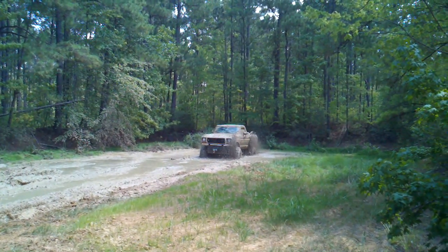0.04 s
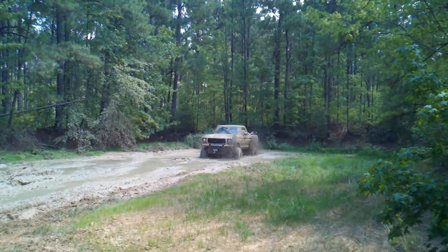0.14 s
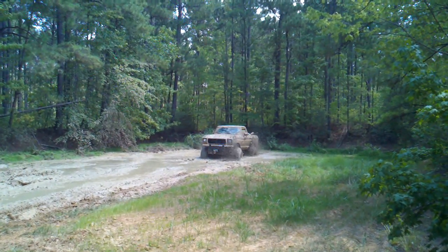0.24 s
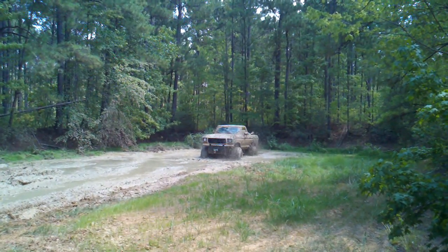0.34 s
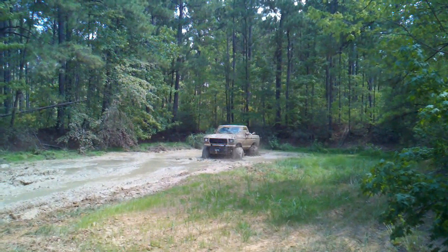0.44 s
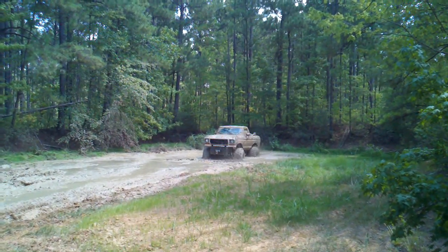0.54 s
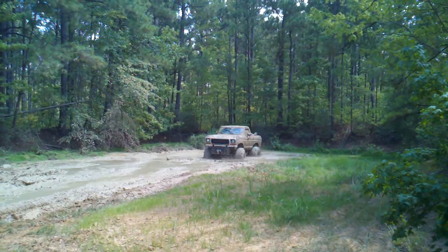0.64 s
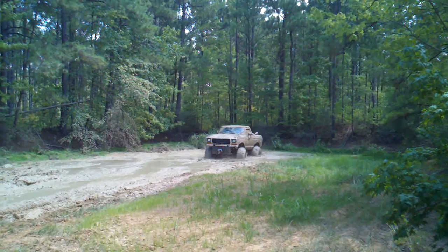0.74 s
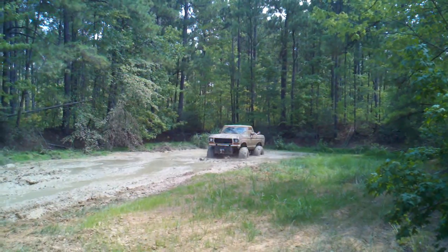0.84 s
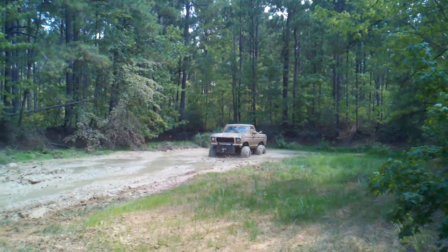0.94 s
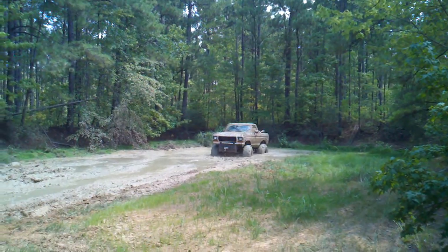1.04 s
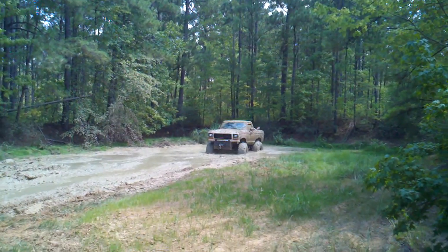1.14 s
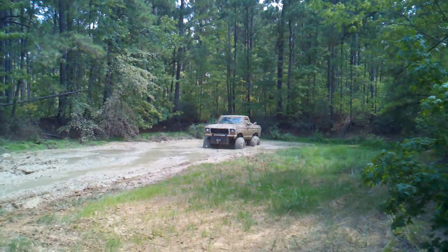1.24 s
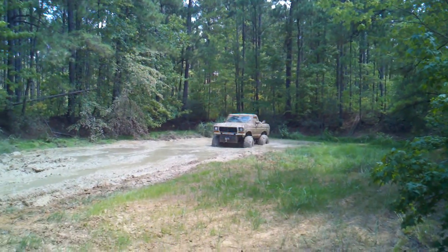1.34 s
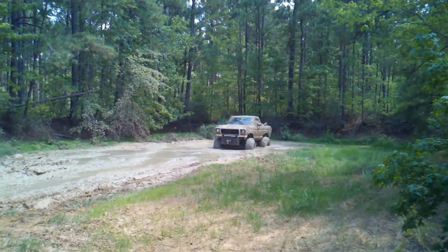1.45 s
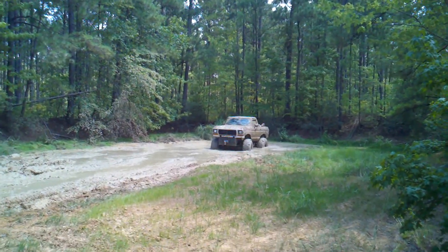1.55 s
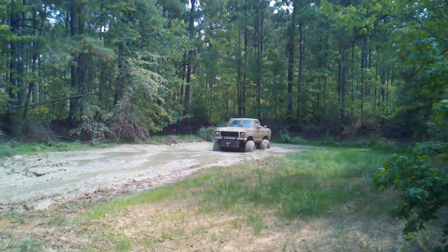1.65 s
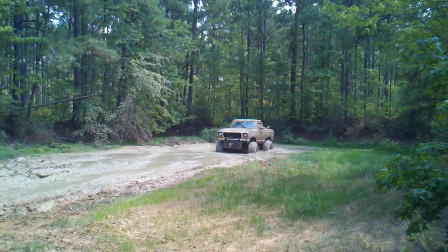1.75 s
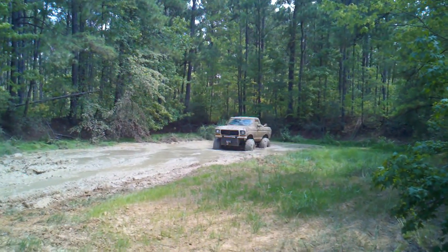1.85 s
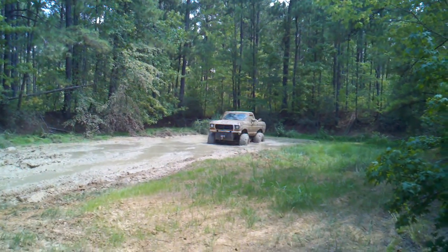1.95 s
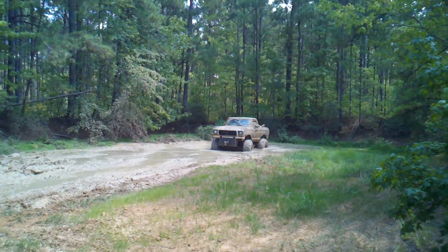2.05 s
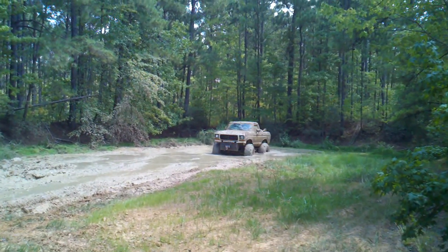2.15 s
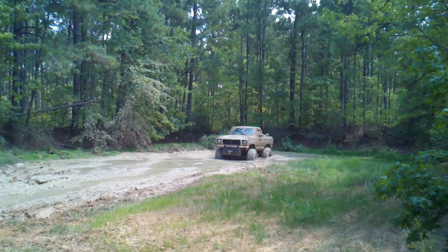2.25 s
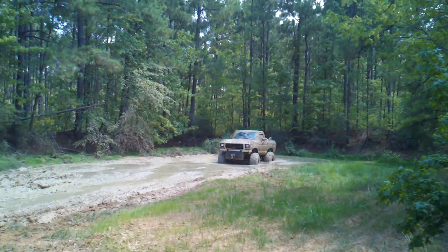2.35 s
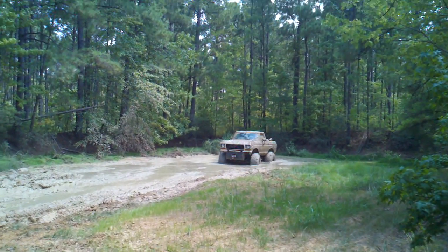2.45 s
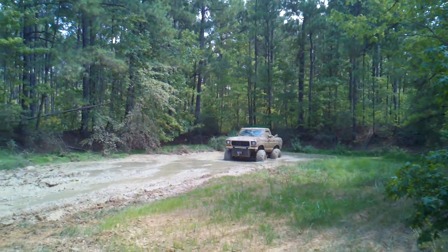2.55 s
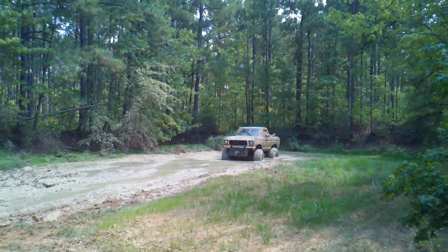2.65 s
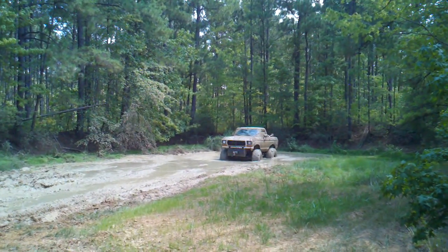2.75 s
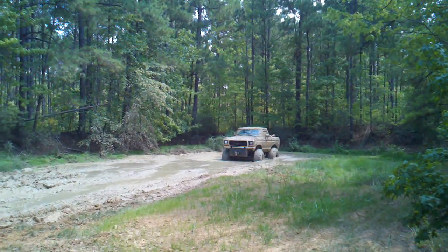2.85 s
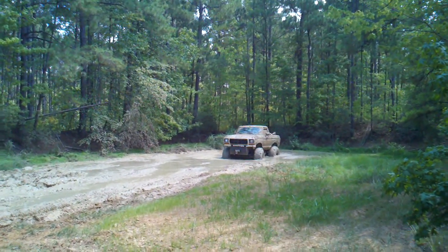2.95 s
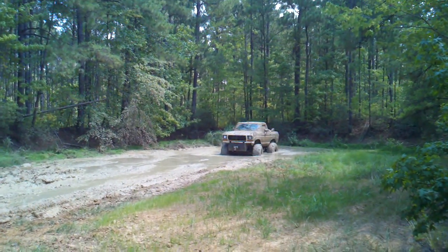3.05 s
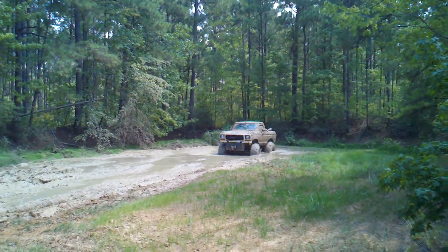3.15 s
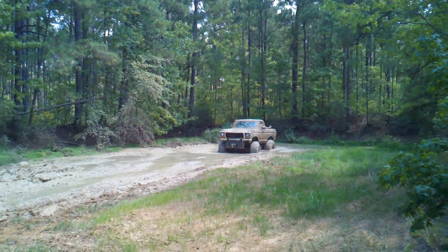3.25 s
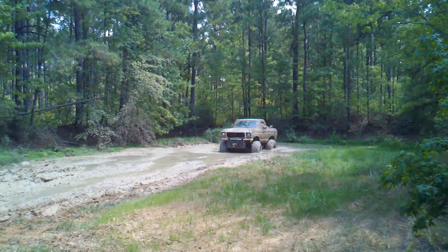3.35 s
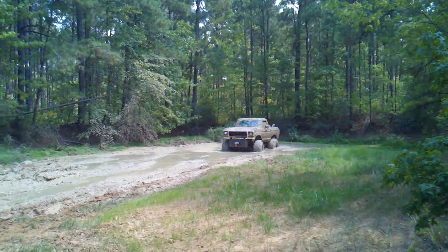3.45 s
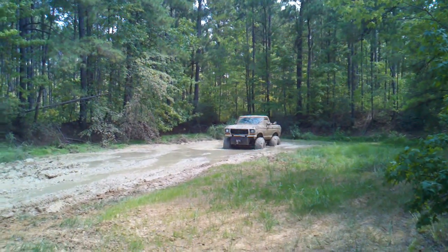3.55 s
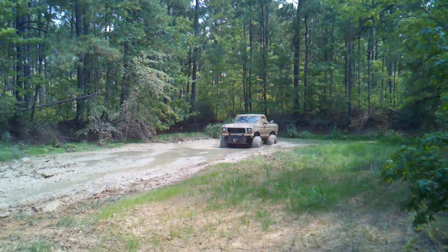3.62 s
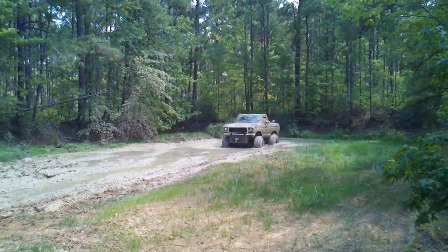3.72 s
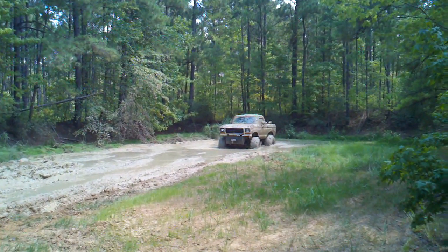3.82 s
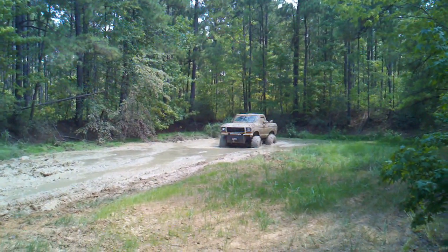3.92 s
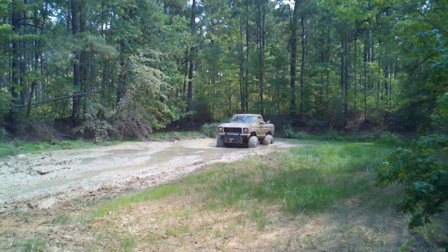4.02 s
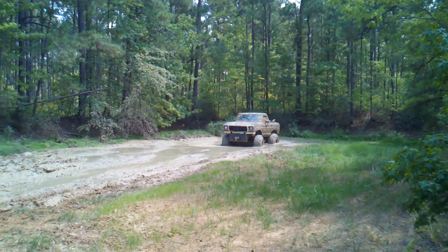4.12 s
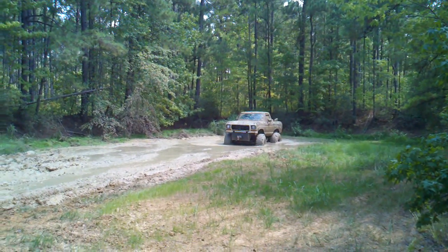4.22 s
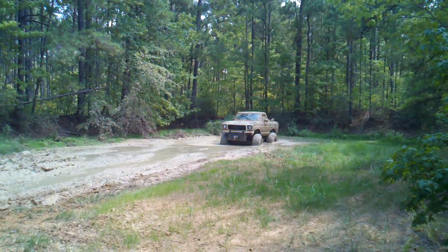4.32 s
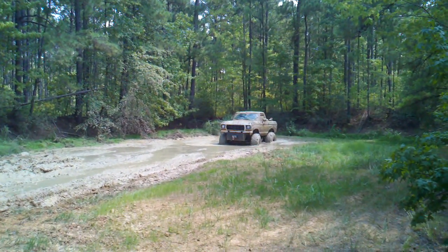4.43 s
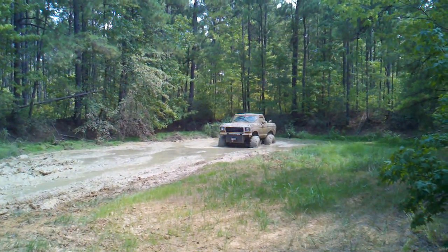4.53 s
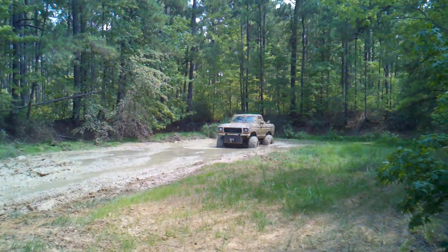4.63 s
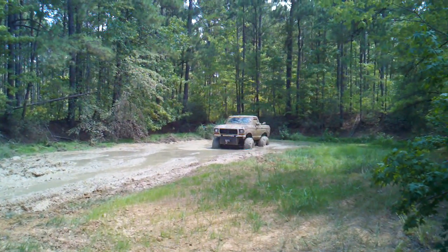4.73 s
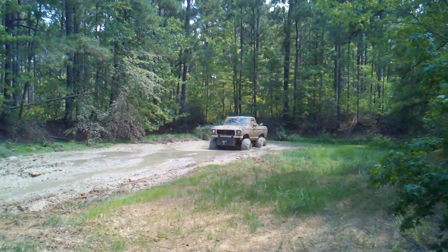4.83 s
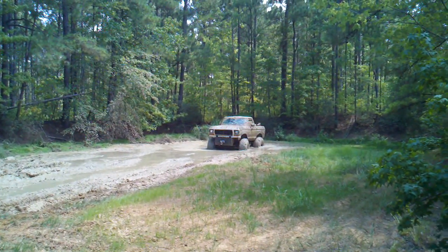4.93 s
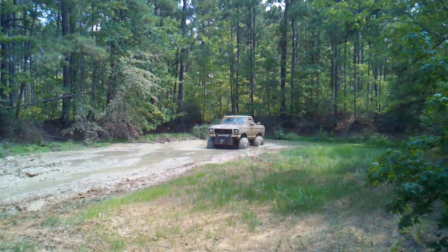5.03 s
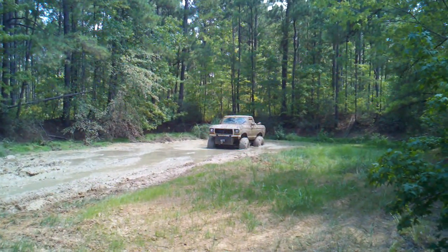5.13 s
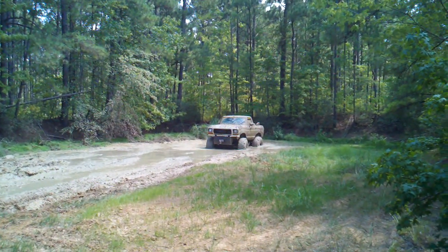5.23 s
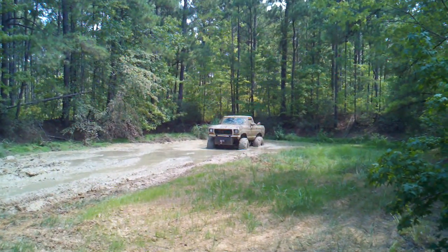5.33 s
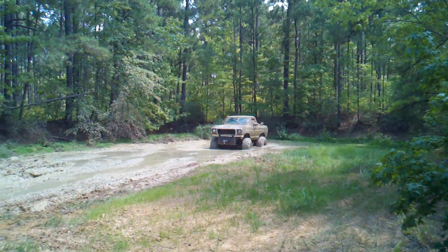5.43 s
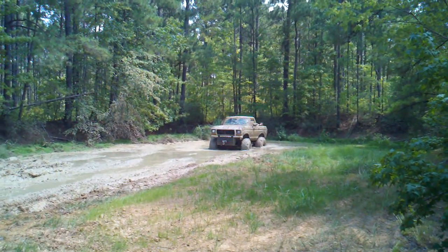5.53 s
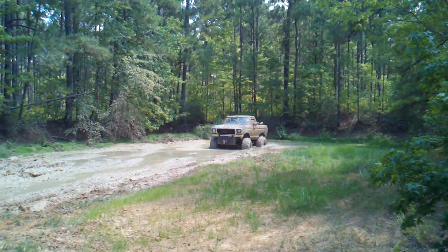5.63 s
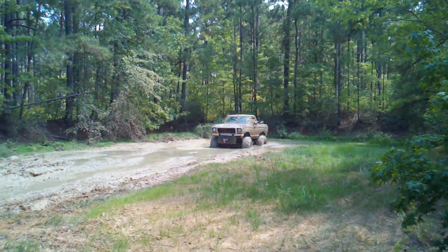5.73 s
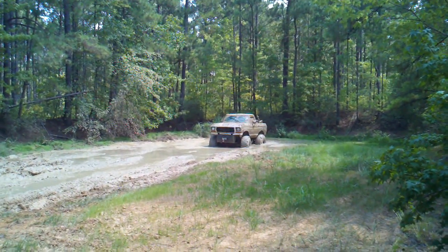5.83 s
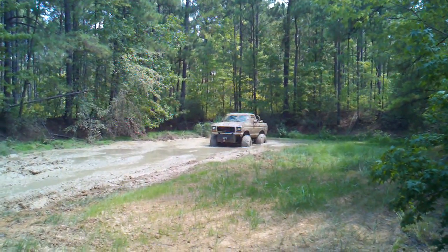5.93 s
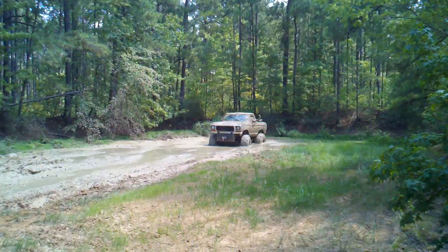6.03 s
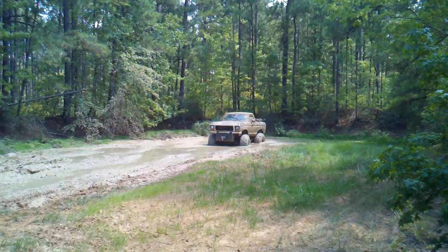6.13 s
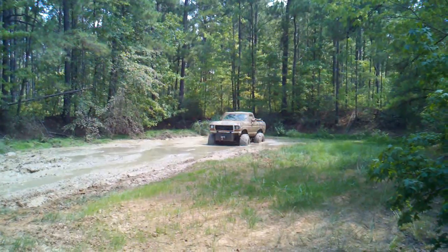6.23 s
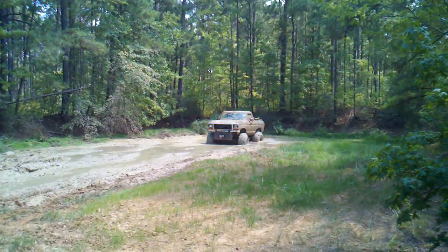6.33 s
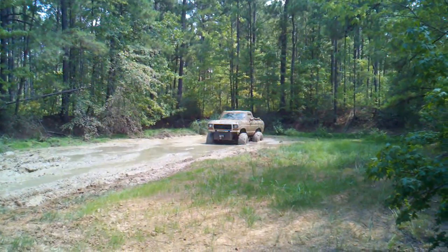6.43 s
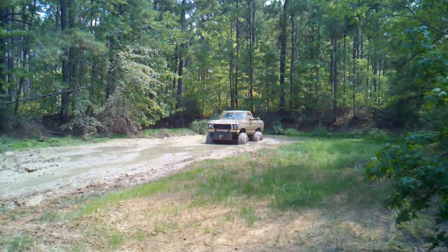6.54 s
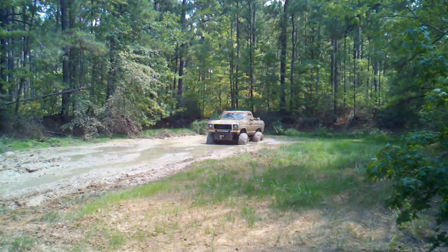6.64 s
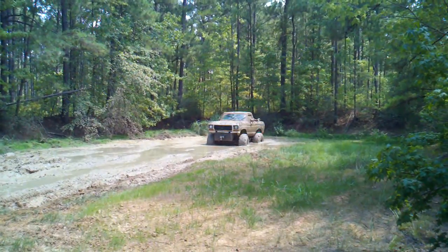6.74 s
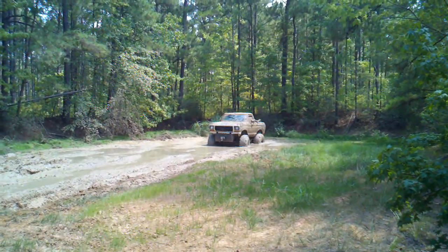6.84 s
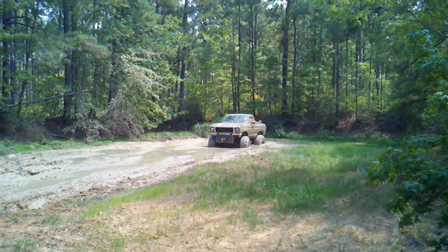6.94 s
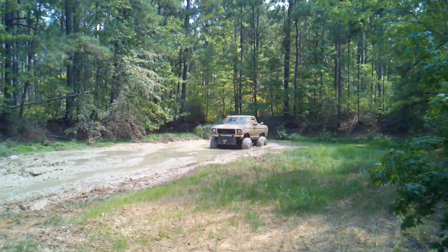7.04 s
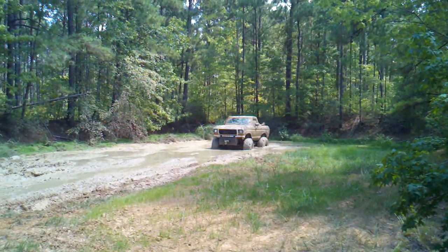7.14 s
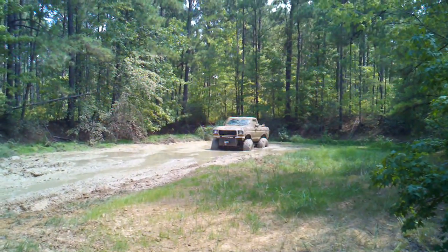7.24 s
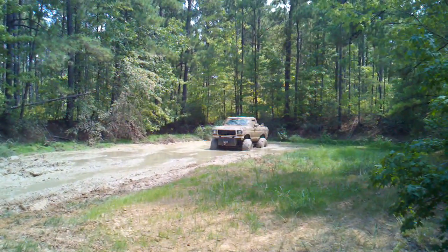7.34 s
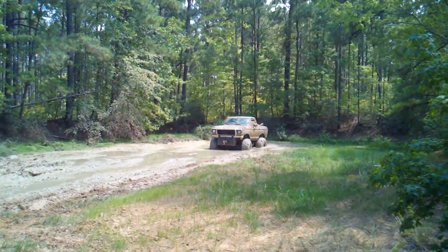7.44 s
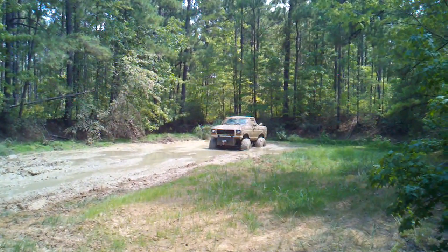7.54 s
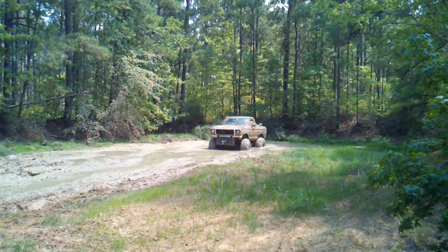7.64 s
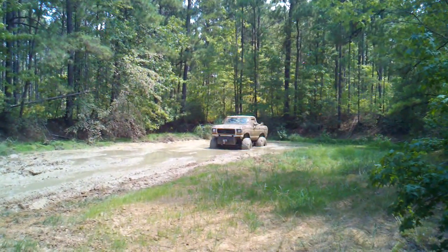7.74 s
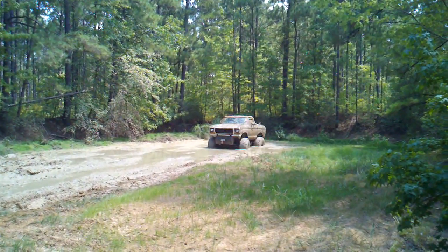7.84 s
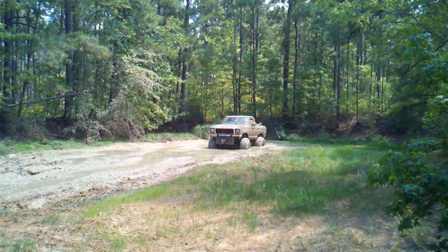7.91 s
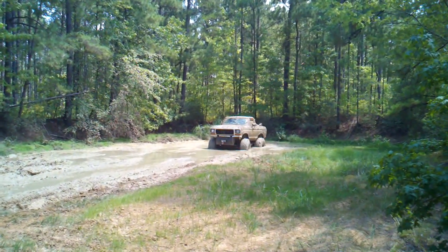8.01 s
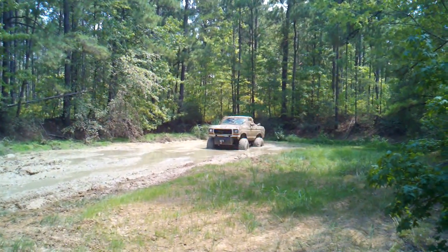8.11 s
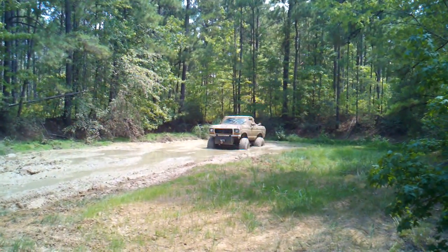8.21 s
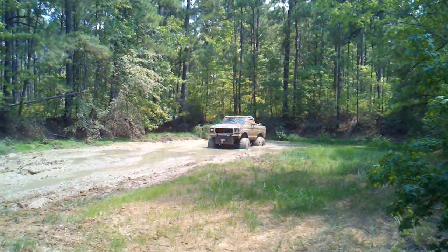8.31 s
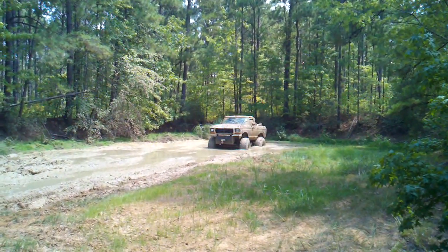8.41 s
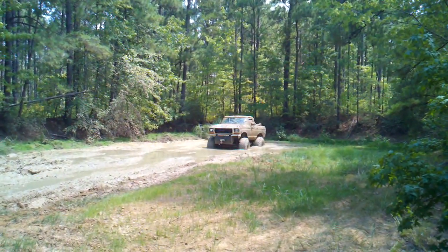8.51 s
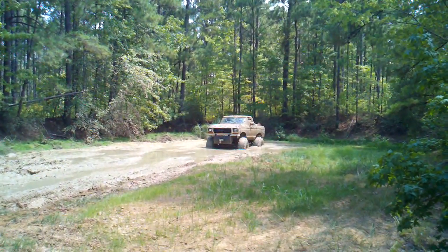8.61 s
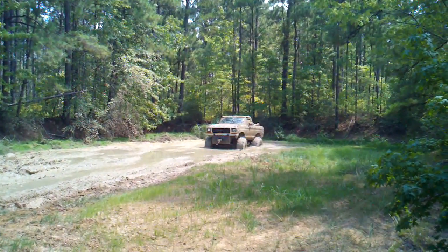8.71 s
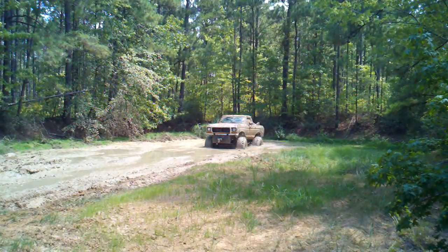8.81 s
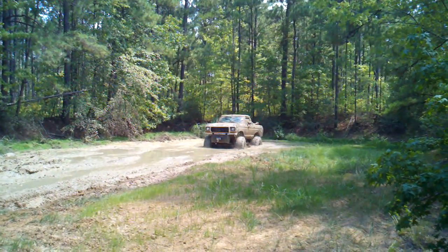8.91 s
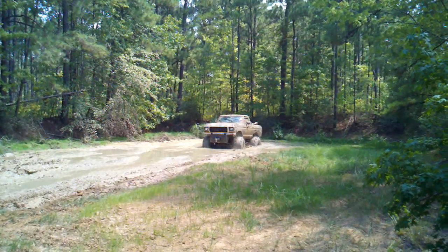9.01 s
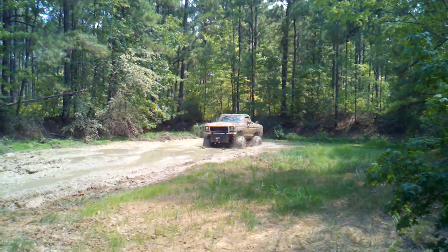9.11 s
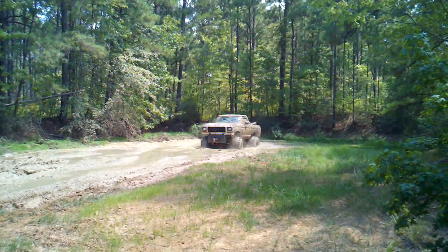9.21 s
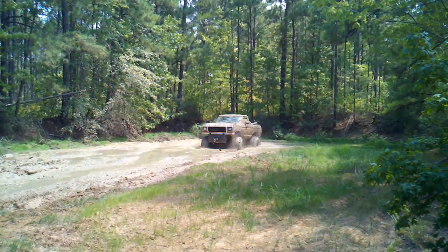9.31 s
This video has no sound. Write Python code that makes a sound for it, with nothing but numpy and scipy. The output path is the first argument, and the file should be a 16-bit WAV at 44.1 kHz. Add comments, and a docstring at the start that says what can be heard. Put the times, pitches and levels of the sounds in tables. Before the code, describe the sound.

Lumpy open-pipe V8 idling in a forest clearing, with sharp cracks and small clinks, before the revs climb steeply into a loud blaring howl.

```python
"""A lifted V8 truck stands in a mud hole in a forest clearing, some way off.
Its revs fall while thrown mud patters down; it lopes near idle with sharp cracks and clatter, then revs up hard.
Firing pulses ring the resonances of the open pipes; noise bursts make the gas, spray and cracks.
Sparse echoes from the trees throw much of the sound back over a faint background."""
import sys
import numpy as np
from scipy import signal
from scipy.fft import rfft, irfft
from scipy.io import wavfile
from scipy.ndimage import uniform_filter1d

SR = 44100
rng = np.random.default_rng(int(sys.argv[2]) if len(sys.argv) > 2 else 0)


def persist_wave(psi):
    """Save psi, clipped to +-1, as 16-bit WAV."""
    counts = np.round(np.clip(psi, -1, 1) * 32767).astype(np.int16)
    wavfile.write(sys.argv[1], SR, np.atleast_2d(counts).T)


N = 413209
TIME = np.arange(N) / SR
SIZE = 2 ** 19  # FFT length
HZ = np.fft.rfftfreq(SIZE, 1 / SR)
IDLE_CYCLES_PER_S = 4  # four-stroke cycles with the throttle at zero

# low resonances of pipes and body:
# (frequency [Hz], width [Hz], relative level at idle [dB], relative level at full load [dB])
BOOM_MODES = [(117, 63, -7.5, -19), (160.7, 24, -0.5, 25), (200, 98, -19, 6), (222.5, 21.4, -6.5, -18),
              (303, 35.6, -13, -18), (445, 340, -40, -9)]
# upper pipe resonances, whose relative weights change from idle to full load:
# (frequency [Hz], width [Hz], relative level at idle [dB], relative level at full load [dB])
BARK_MODES = [(492, 118, -17, -6), (600.8, 110, 2, 0), (720.4, 94, -8, 7), (1026, 22, -1.5, -9.5),
              (1127, 145, -14, 4.5), (1298, 87, -17, -45), (1403, 67, -5, -0.5), (1702, 165, -32, -9.5),
              (1785, 106, -15.5, -5), (2240, 1070, -26.5, -52)]
# treble colour of gas and spray: (frequency [Hz], relative level [dB])
HISS_COLOUR = [(80, -16), (900, -2.5), (2000, 4), (3000, -3), (3600, 2), (4100, 0.5), (4600, -7),
               (5300, -16), (6200, -4.5), (7300, -6), (9000, -7.5), (10500, -12), (12000, -11.5),
               (13200, -23), (14000, -6.5)]


def gain_of(db):
    """Decibels to amplitude."""
    return 10 ** (np.asarray(db) / 20)


def evened(x):
    """Scales to rms 1."""
    return x / np.sqrt(np.mean(x ** 2) + 1e-20)


def steadied(x, size=9000):
    """Scales to a running rms of 1, keeping the single beats."""
    power = uniform_filter1d(uniform_filter1d(x ** 2, size), size)
    return x / np.sqrt(abs(power) + 1e-14)


def curve(rows, order=1):
    """One column of a time table at every sample."""
    columns = np.transpose(rows)
    return np.interp(TIME, columns[0], columns[order])


def read(rows, hz, order=1):
    """One column of a frequency table on a log axis."""
    columns = np.transpose(rows)
    return np.interp(np.log(hz + 1), np.log(columns[0] + 1), columns[order])


def drift(hz):
    """Low-passed random drift of rms 1, up to a rate."""
    rate_hz, count = 400, 4096
    spectrum = rfft(rng.standard_normal(count))
    slow = irfft(spectrum / (1 + (np.fft.rfftfreq(count, 1 / rate_hz) / hz) ** 4))
    return evened(np.interp(TIME * rate_hz, np.arange(len(slow)), slow))


def ring(x, gain):
    """Causal minimum-phase filter with the given gain at each frequency."""
    cepstrum = irfft(np.log(np.maximum(gain, 1e-5)))
    cepstrum[1:SIZE // 2] *= 2
    cepstrum[SIZE // 2 + 1:] = 0
    return irfft(rfft(x, SIZE) * np.exp(rfft(cepstrum)))[:N]


def puffs(clicks, decay_s):
    """Each click lets out a burst of noise that dies away."""
    envelope = signal.lfilter([1], [1, -np.exp(-1 / (decay_s * SR))], clicks)
    return envelope * rng.standard_normal(N)


def ping(hz, peak_s):
    """A short ring with a soft start, its envelope peaking at 1 after peak_s."""
    t = TIME[:2000]
    age = t / peak_s
    return age * np.exp(1 - age) * np.sin(2 * np.pi * hz * t)


def level(throttle, rise, shut_db, pedal_db, rise_db):
    """Gain of a layer that grows with the throttle (0-1) and with load (0-1) or speed (octaves)."""
    return gain_of(shut_db + pedal_db * throttle + rise_db * rise)


def pedal(press_s=.3, release_s=.5, slack=.04):
    """Throttle opening (0-1), lug and blare (dB): each press rises quickly and falls away slowly."""
    # accelerator presses, the deepest at any moment sets the throttle:
    # (start [s], time to release [s], depth [0-1], extra boom from lugging [dB], extra bark [dB])
    press_rows = [(-.5, 0.57, 0.6, 1, -0.5), (1.181, 0.38, 0.66, 1.5, 0.5), (1.999, 0.29, 0.78, 1, -0.5),
                  (2.55, 0.67, 0.48, 0.5, -1), (3.651, 1.01, 0.29, 1, 0), (4.951, 0.57, 0.41, 1.5, -0.5),
                  (5.499, 0.5, 0.44, 7.5, 3.5), (5.947, 0.81, 0.36, 4.5, 0.5), (7.3, 0.71, 1, -1.5, 2),
                  (7.734, 0.62, 0.99, 0.5, -3.5), (8.113, 1.22, 0.66, -9, -1.5),
                  (8.8, 0.47, 0.98, -4, -1.5), (9.006, .4, 0.85, 1, -2.5)]
    presses = []
    for start_s, length_s, depth, _, _ in press_rows:
        rise = (TIME - start_s) / press_s
        fall = 1 - (TIME - start_s - length_s) / release_s
        presses.append(depth * np.clip(np.minimum(rise, fall), 0, 1))
    presses = np.array(presses)
    # average of the extras, weighted by depth
    lug_db, blare_db = np.transpose(press_rows)[3:] @ presses / (presses.sum(0) + slack)
    throttle = np.maximum(presses.max(0), slack)  # never quite closes
    return throttle, lug_db, blare_db


def crank(speed, load, wobble=.02):
    """Four-stroke cycles turned so far; the speed wanders at idle and firms up under load."""
    return np.cumsum(speed * (1 + wobble * (1 - load) * drift(8.94))) / SR


def firings(cycles, load, scatter_db, jitter_s):
    """One pulse a cylinder, uneven in strength and timing at idle and steadier under load."""
    # strength of each cylinder in firing order, the two banks taking uneven turns: [dB]
    cylinders_db = [3, -3.5, 0.5, 2.5, -9.5, -2.5, 2, 0]
    count = np.floor(len(cylinders_db) * cycles).astype(int)
    at = np.flatnonzero(np.diff(count, prepend=0) > 0)
    chance = rng.uniform(-1, 1, (N, 2))[count[at]].T
    strength, delay = chance * (1 - .5 * load[at])
    size = gain_of(np.take(cylinders_db, count[at] % len(cylinders_db)) + scatter_db * strength)
    shifted = at + (jitter_s * SR * delay).astype(int)
    return np.bincount(np.clip(shifted, 0, N - 1), size, N)


def voice(modes, column, low_hz, steep=3):
    """Gain of a set of resonances at each frequency; the open end radiates no deep bass."""
    resonances = sum(gain_of(m[column]) / (1 + (2 * (HZ - m[0]) / m[1]) ** 2) for m in modes)
    return resonances / (1 + (low_hz / (HZ + 1)) ** steep)


def pipe(drive, modes, load, low_hz):
    """Resonances ring with the pulses and change weight with load."""
    idle = steadied(ring(drive, voice(modes, 2, low_hz)))
    full = steadied(ring(drive, voice(modes, 3, low_hz, steep=5)))
    return steadied((1 - load) * idle + load * full)


def wander(x, load, sway_s=.0008, sway_hz=6):
    """Uneven gas flow at idle makes the pitch of the pipes waver, by a drifting delay."""
    return np.interp(TIME + sway_s * (1 - load) * drift(sway_hz), TIME, x)


def exhaust(cycles, load, throttle, lug_db, blare_db, octaves, boom_rough=0.62, bark_rough=1.65, burble_db=1.08):
    """Pressure pulses give the boom; turbulent gas roughens boom and bark, less so under load."""
    low = firings(cycles, load, scatter_db=3.5, jitter_s=.0016)
    high = firings(cycles, load, scatter_db=3, jitter_s=.0007)
    rough = 1 - .1 * load
    boom_drive = steadied(low) + boom_rough * rough * steadied(puffs(low, decay_s=.023))
    bark_drive = steadied(high) + bark_rough * rough * steadied(puffs(high, decay_s=.014))
    # lugging holds the boom nearer its idle colour
    boom_load = np.clip(load - .18 * np.maximum(lug_db, 0), 0, 1)
    boom = pipe(boom_drive, BOOM_MODES, boom_load, low_hz=96.6)
    bark = wander(pipe(bark_drive, BARK_MODES, load, low_hz=305), load, sway_s=.0005, sway_hz=16)
    # square root: the boom swells at the first touch of the pedal
    boom_gain = level(np.sqrt(throttle), load, shut_db=-58.5, pedal_db=24.55, rise_db=.94) * gain_of(lug_db)
    bark_gain = level(throttle, octaves, shut_db=-50.5, pedal_db=7.27, rise_db=8.27) * gain_of(blare_db)
    burble = gain_of(burble_db * (1.5 - .5 * load) * drift(26.5))
    lope = gain_of(1.3 * (1 - load) * drift(9))
    return lope * (boom * boom_gain + bark * bark_gain * burble)


def chugs(thump_db=1, pop_db=-4, cough_db=-23, cough_s=0.014):
    """Now and then a cylinder fires much harder: a thump, a pop and a cough of gas through the same pipes."""
    # heaviest single chugs of the loping engine: (time [s], boom drive [dB], bark drive [dB])
    chug_rows = [(0.024, -23.5, -25), (0.333, -31.5, -48), (1.494, -40, -25), (1.947, -53, -44.5),
                 (2.095, -27, -23.5), (2.346, -35, -42), (2.69, -28, -24.5), (2.897, -44, -29),
                 (3.097, -28, -25.5), (3.178, -35, -28), (3.318, -52, -31), (3.541, -32.5, -41),
                 (3.746, -31, -39), (3.924, -29, -42), (4.061, -45, -30), (4.413, -27.5, -30),
                 (4.568, -39, -45), (4.819, -41, -52), (4.893, -31.5, -32), (5.03, -31, -26.5),
                 (5.182, -30, -27), (5.304, -35, -58), (5.574, -30, -44), (5.692, -21.5, -26),
                 (5.959, -24, -34), (6.115, -37, -39), (6.275, -32, -48), (6.546, -24, -28.5),
                 (6.725, -24, -39), (7.006, -46, -27.5), (7.238, -33, -52), (7.44, -40, -27.5),
                 (7.767, -35, -36), (7.984, -33, -17), (8.177, -25, -24)]
    thumps, coughs = np.zeros((2, N))
    for s, boom_db, bark_db in chug_rows:
        at = round(s * SR)
        thumps[at], coughs[at] = gain_of(boom_db), gain_of(bark_db)
    low = voice(BOOM_MODES, 2, low_hz=86.0)
    high = voice(BARK_MODES, 2, low_hz=305)
    blast = gain_of(pop_db) * coughs + gain_of(cough_db) * puffs(coughs, cough_s)
    return gain_of(thump_db) * ring(thumps, low) / low.mean() + ring(blast, high) / high.mean()


def drone(cycles, speed, waver_db=2.53, top_db=-.5, db_per_octave=11.5, from_cycles_per_s=6.1):
    """As the engine pulls, its repeating cylinder pattern gives tones that swell in the pipes' pass bands."""
    # tones at each multiple of the cycle rate, from the fifth up: relative level [dB]
    orders_db = [-4, -14, -11, 3, -5, -7, 6, -11, 5, -2, 5, 6, 1, 3, 5, 1, 3, -2, -1, 2, 1, -1, 4, -1, 3, 2,
                 0, 1, 0, 4, -2, -1, 1, 0]
    # how well the pipes carry those tones: (frequency [Hz], level [dB])
    carry_rows = [(25, -75), (45, -53), (60, -38), (90, -34), (115, -28), (145, -24), (172, -18),
                  (200, -24), (240, -29), (290, -28), (370, -36), (480, -35), (590, -40), (730, -33),
                  (900, -50), (1130, -37)]
    carry = np.transpose(carry_rows)
    wavers = [waver_db * drift(6.3) for _ in range(5)]
    tones = 0
    for k, db in enumerate(orders_db, 5):
        gain = gain_of(db + np.interp(k * speed, *carry) + wavers[k % len(wavers)])
        tones = tones + gain * np.sin(2 * np.pi * (k * cycles + rng.random()))
    level_db = top_db + db_per_octave * np.log2(speed / speed.max())
    return tones * gain_of(level_db) * np.clip(speed - from_cycles_per_s, 0, 1)


def wind_down(flutter_db=2, waver=0.017):
    """As the revs fall at first, the low pipe notes sag and die away."""
    # (start frequency [Hz], sag [Hz/s], start level [dB], fade [dB/s])
    notes = [(165, 26, -33, 27), (234, 24, -43, 16)]
    out = 0
    for hz, sag, db, fade in notes:
        gain = gain_of(db - fade * TIME + flutter_db * drift(24))
        turns = np.cumsum((hz - sag * TIME) * (1 + waver * drift(12))) / SR
        out = out + gain * np.sin(2 * np.pi * turns)
    return out


def rasp(pulses, throttle, load, spit_s=0.0049, centre_hz=3760, width_hz=1520):
    """Under load the strong firings spit a hard, bright edge from the pipe ends."""
    band = 1 / (1 + (2 * (HZ - centre_hz) / width_hz) ** 4)
    gain = level(throttle, np.sqrt(load), shut_db=-75.5, pedal_db=12.4, rise_db=21.6)
    return steadied(ring(puffs(pulses, spit_s), band)) * gain


def cracks(throttle, snap_s=0.011, rise_s=0.00056, splutter_s=.045, splutter_db=-13, splutter_clump_db=1.0,
           body_db=7, top_db=12.0, small_per_s=8, small_db=-68):
    """Quick noise bursts, dull or bright, that splutter on; small ones by chance while the pedal is down."""
    # loudest cracks, mostly as the pedal goes down: (time [s], body drive [dB], top drive [dB])
    crack_rows = [(1.3, -54.5, -54), (1.323, -52, -52.5), (1.3479, -50.5, -53), (1.402, -50, -52),
                  (1.472, -46.5, -45.5), (1.501, -53, -50), (1.6407, -53.0, -50.5), (2.0702, -49, -54),
                  (2.1235, -54, -53.5), (2.149, -50.5, -57), (2.194, -48.0, -52), (2.263, -47.5, -52.5),
                  (2.3048, -53, -52.0), (2.327, -60, -75), (2.442, -54, -84), (2.876, -55.5, -53.0),
                  (2.935, -56, -55), (3.005, -60, -63), (3.29, -62, -55.0), (3.7458, -55.5, -57),
                  (3.88, -58, -62.5), (4.008, -62, -63), (4.172, -56.5, -63), (4.221, -57.5, -55.5),
                  (4.572, -54.5, -72), (4.707, -59.5, -58.0), (5.005, -56.0, -63), (5.0575, -55, -56),
                  (5.4084, -57.5, -62.0), (5.528, -57.0, -54), (5.667, -60, -55.5), (5.7795, -49.5, -59),
                  (5.938, -60, -63), (7.361, -58, -61), (7.4396, -50.5, -53), (7.486, -59, -47.5),
                  (7.5962, -55, -65)]
    # (frequency [Hz], relative level [dB])
    crack_colour = [(300, -22), (700, 2), (1400, 17), (2200, 6), (3600, 12), (4300, 7), (5300, -11),
                    (7000, 2.5), (9000, -9.5), (14000, -9.5)]
    small = (rng.random(N) < small_per_s * throttle / SR) * gain_of(small_db)
    clicks = np.array([small, small])
    for s, *dbs in crack_rows:
        clicks[:, round(s * SR)] = gain_of(dbs)
    keep = np.exp(-1 / (rise_s * SR))
    softened = signal.lfilter([1 - keep], [1, -keep], clicks + 1e-15)
    tail = gain_of(splutter_db + splutter_clump_db * drift(64))
    body, top = (puffs(c, snap_s) + tail * puffs(c, splutter_s) for c in softened)
    colour = gain_of(read(crack_colour, HZ))
    low = 1 / (1 + (HZ / 5300) ** 10)  # splits body from top
    return gain_of(body_db) * ring(body, colour * low) + gain_of(top_db) * ring(top, colour * (1 - low))


def mudfall(mud_db=-49.5, lands_s=0.7, mud_fade_db_per_s=19,
            spin_db=-38.5, spin_s=7.97, spin_rise_s=0.066, spin_fade_db_per_s=15):
    """Gain of mud raining down at first, then thinning, and of spray flung as the tyres spin again."""
    mud = gain_of(mud_db - mud_fade_db_per_s * np.maximum(TIME - lands_s, 0))
    rise = np.clip((TIME - spin_s) / spin_rise_s, 0, 1)
    return mud + rise * gain_of(spin_db - spin_fade_db_per_s * np.maximum(TIME - spin_s, 0))


def hiss(pulses, gain, spray_db=0.5, drops_per_s=2500, drop_spread_db=3, clump_db=2.5, mud_clump_db=1):
    """Gas spits from the pipes at each firing while fine mud and water patter down in clumps."""
    drop_size = gain_of(drop_spread_db * np.minimum(rng.exponential(1, N), 4))
    drops = (rng.random(N) < drops_per_s / SR) * drop_size
    colour = gain_of(read(HISS_COLOUR, HZ))
    gas = steadied(ring(puffs(pulses, decay_s=0.024), colour))
    spray = steadied(ring(puffs(drops, decay_s=0.0045), colour))
    engine_spray = gain * gain_of(spray_db + clump_db * drift(31))
    mud = mudfall() * gain_of(mud_clump_db * drift(0.37))
    return gas * gain + spray * np.hypot(engine_spray, mud)


def drips(gain, drips_per_s=220, drips_db=-12, clump_db=3.5, clump_hz=9, spread_db=-3.5, high_db_per_octave=4):
    """Larger drops fall off the body in bunches, each with its own brief pitch."""
    pitches_hz = np.geomspace(5800, 13000, num=24)
    clump = clump_db * np.minimum(drift(clump_hz), 2)
    spread = spread_db * np.minimum(rng.exponential(1, N), 4)
    size = (rng.random(N) < drips_per_s / SR) * gain_of(clump + spread)
    kind = rng.integers(0, len(pitches_hz), N)
    out = 0
    for k, hz in enumerate(pitches_hz):
        colour_db = read(HISS_COLOUR, hz) + high_db_per_octave * np.log2(hz / pitches_hz[0])
        tone = gain_of(colour_db) * ping(hz, peak_s=.001)
        out = out + signal.oaconvolve(size * (kind == k), tone)[:N]
    return evened(out) * gain * gain_of(drips_db)


def clinks(ring_db=-10, tick_db=-11.5, scatter_db=-24, scatter_s=0.0047):
    """A dry tick of contact, a ring that lasts a few milliseconds, and a bright scatter of grit."""
    # bright clinks, as of grit on metal: (time [s], drive level [dB], ring frequency [Hz])
    clink_rows = [(0.9417, -35, 7150), (1.474, -35, 7300), (1.5365, -28.5, 7000), (1.589, -25.5, 3360),
                  (2.664, -40, 7000), (2.7205, -34, 6830), (3.212, -47, 7050), (3.2905, -45, 8800),
                  (3.3437, -38, 7100), (3.569, -36, 8980), (3.8029, -37, 7045), (4.6244, -39, 6960),
                  (5.057, -36, 8700), (5.671, -44, 3450), (6.4178, -40, 6080), (6.6369, -39, 6620),
                  (7.6127, -29, 6284)]
    clicks, rings = np.zeros((2, N))
    for s, db, hz in clink_rows:
        at, tone = round(s * SR), ping(hz, peak_s=1 / 600)
        clicks[at] = gain_of(db)
        rings[at:at + len(tone)] += gain_of(db) * tone
    ticks = puffs(clicks, decay_s=0.0015)
    grit = np.diff(puffs(clicks, scatter_s), prepend=0)
    return gain_of(ring_db) * rings + gain_of(tick_db) * ticks + gain_of(scatter_db) * grit


def whine(hz=1293, whine_db=-63, waver=0.00395, flutter_db=3):
    """A thin whine with a slight waver and flutter, as of an electric pump."""
    turns = np.cumsum(hz * (1 + waver * drift(17.6))) / SR
    return gain_of(whine_db + flutter_db * drift(45)) * evened(np.sin(2 * np.pi * turns))


def forest(x, first_s=0.01104, echoes_per_s=2500):
    """Trunks scatter the sound as sparse echoes, different at each ear; leaves soak up the treble."""
    # (frequency [Hz], 60 dB decay time [s])
    decay_rows = [(100, 1), (500, 0.98), (2000, 0.61), (5000, 0.22), (12000, 0.46)]
    t_taps = TIME[:SR]
    taps = rng.standard_normal((2, SR)) * (rng.random((2, SR)) < echoes_per_s / SR) * (t_taps > first_s)
    hz, t, z = signal.stft(taps, SR, nperseg=256)
    fade = gain_of(-60 * t / read(decay_rows, hz)[:, None])
    tail = signal.istft(z * fade, SR, nperseg=256)[1]
    # scales by the energy of a tail that decays as at 560 Hz
    norm = np.linalg.norm(taps[0] * gain_of(-60 * t_taps / read(decay_rows, 560)))
    running = np.pad(x, (SR, 0), mode="reflect")  # the trees are already ringing at the start
    return signal.fftconvolve(running[None], tail / norm, axes=1)[:, SR:SR + N]


def air(air_db=-66):
    """Quiet rumble and rustle of the clearing: coloured noise, independent at each ear."""
    # (frequency [Hz], relative level [dB])
    air_colour = [(20, 2), (45, 16), (90, -57), (400, -35), (1500, -15), (5000, -7), (14000, -5)]
    colour = gain_of(read(air_colour, HZ))
    return gain_of(air_db) * np.array([evened(ring(rng.standard_normal(N), colour)) for _ in range(2)])


def scene(idle_speed=6.7, full_speed=13, pedal_cycles_per_s=2.6, direct_range_db=8,
          engine_wet_db=-.5, treble_wet_db=-1):
    """The pedal drives speed, load and loudness; much of the sound returns from the trees."""
    # engine speed once the wheels break loose: (time [s], four-stroke cycles [1/s])
    run_up = [(7.7, 6.8), (7.82, 7.8), (8.0, 9.02), (8.14, 11.13), (8.27, 11.94), (8.43, 14.85),
              (8.54, 16.22), (8.64, 17.85), (8.78, 19.34), (8.87, 20.84), (8.96, 22.27), (9.08, 23.64),
              (9.21, 27.37), (9.29, 28.66), (9.37, 30.19)]
    throttle, lug_db, blare_db = pedal()
    bogged = IDLE_CYCLES_PER_S + pedal_cycles_per_s * throttle
    speed = np.where(TIME < run_up[0][0], bogged, curve(run_up))
    load = np.clip((speed - idle_speed) / (full_speed - idle_speed), 0, 1)
    octaves = np.log2(speed / IDLE_CYCLES_PER_S)
    cycles = crank(speed, load)
    pipes = wander(exhaust(cycles, load, throttle, lug_db, blare_db, octaves), load)
    engine = pipes + chugs() + whine()
    tones = drone(cycles, speed) + wind_down()
    fizz = level(throttle, octaves, shut_db=-65, pedal_db=8, rise_db=8.33)
    pulses = firings(cycles, load, scatter_db=4.5, jitter_s=0.002)
    treble = hiss(pulses, fizz) + rasp(pulses, throttle, load) + cracks(throttle)
    treble = treble + clinks() + drips(fizz * (1 - load))
    direct = engine * gain_of(direct_range_db * (load - 0.5)) + tones + treble
    scattered = gain_of(engine_wet_db) * engine + .15 * tones + gain_of(treble_wet_db) * treble
    return direct + forest(scattered) + air()


def notch(hz, width_hz):
    """Gain of a narrow dip at one frequency."""
    return (HZ - hz) ** 2 / ((HZ - hz) ** 2 + width_hz ** 2)


def record(dry, lean=0.75, edge_hz=13950):
    """Stereo colouring: narrow dips in mid and side, a width that varies with frequency; then the band limit."""
    # stereo width: (frequency [Hz], side gain [dB], phase of the mid signal added to the side [rad])
    width_rows = [(30, 11, 5), (70, 2, -2), (186, -19, -1.5), (443, -3.5, 2), (630, -20, -2.5),
                  (784, -9.5, -.8), (1290, -21, -2), (2210, 3, -2.5), (2980, 8.5, -1.5), (3850, -2.5, -2),
                  (4320, -1.5, -5.5), (5170, 10.5, -5), (6000, 0, -1.4), (7560, 7.5, -1.7),
                  (14000, 5.5, -1.5)]
    left, right = rfft(dry, SIZE)
    mid, side = (left + right) / 2, (left - right) / 2
    turn = np.exp(1j * read(width_rows, HZ, order=2))
    side = side + lean * mid * turn / (1 + (HZ / 7000) ** 4)
    side = side * gain_of(read(width_rows, HZ))
    side = side * notch(hz=1270, width_hz=190) * notch(hz=3910, width_hz=210)
    mid = mid * notch(hz=2639, width_hz=220) * np.sqrt(notch(hz=5110, width_hz=87))
    edge = np.clip((edge_hz + 60 - HZ) / 120, 0, 1)
    return irfft(np.array([mid + side, mid - side]) * edge)[:, :N]


dry = scene()
out = record(dry)
persist_wave(out)
```